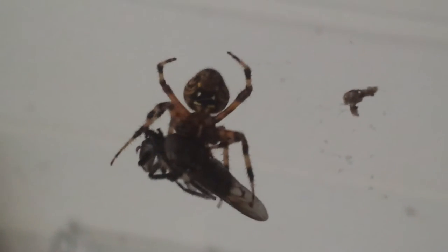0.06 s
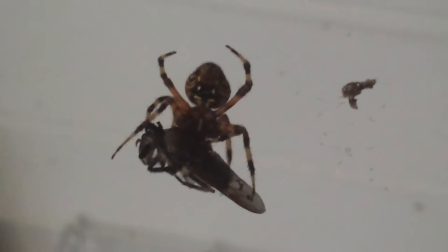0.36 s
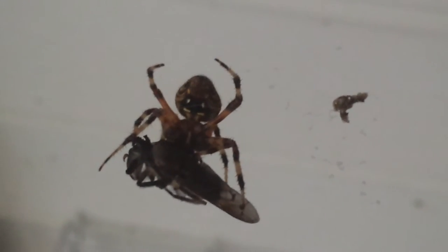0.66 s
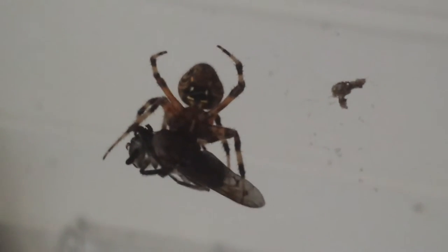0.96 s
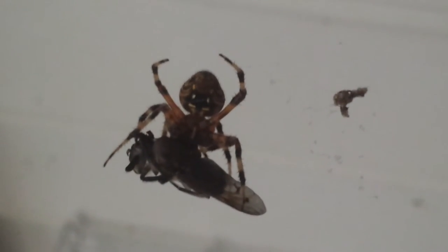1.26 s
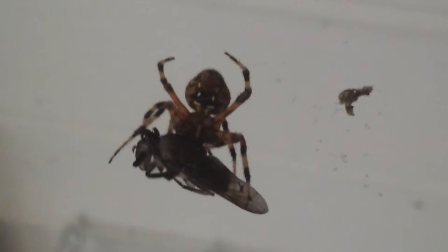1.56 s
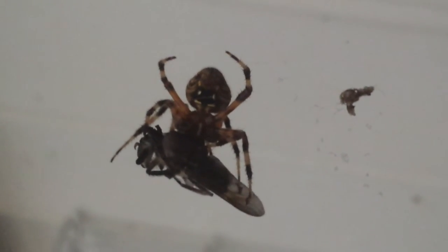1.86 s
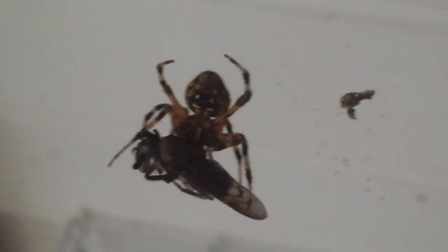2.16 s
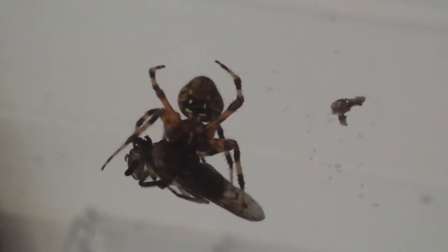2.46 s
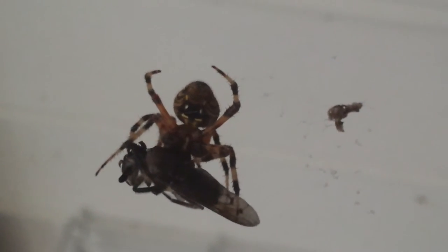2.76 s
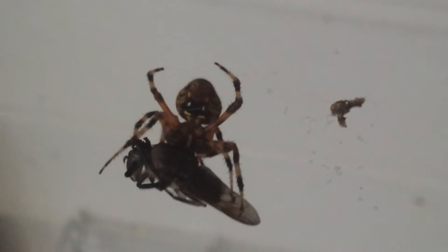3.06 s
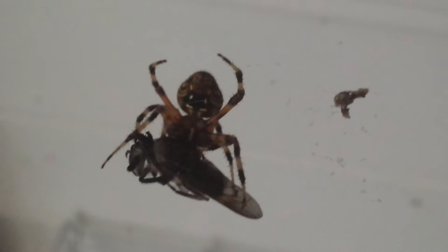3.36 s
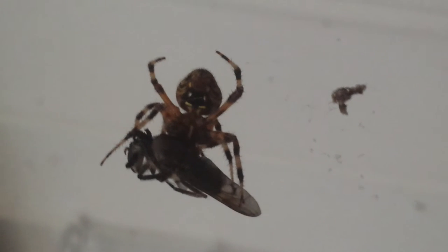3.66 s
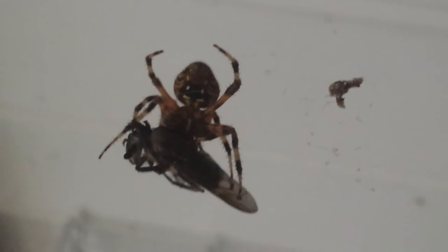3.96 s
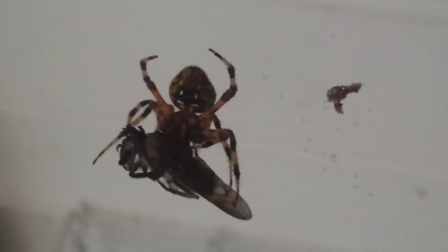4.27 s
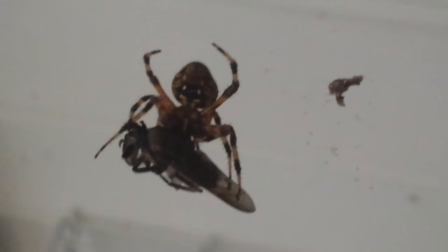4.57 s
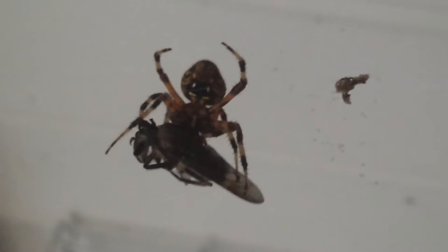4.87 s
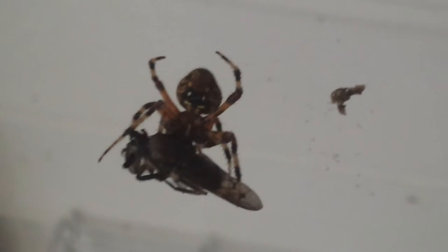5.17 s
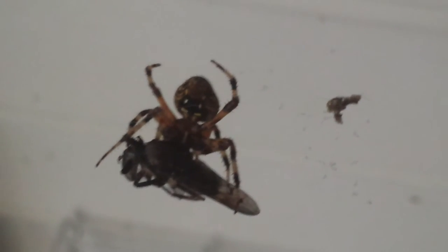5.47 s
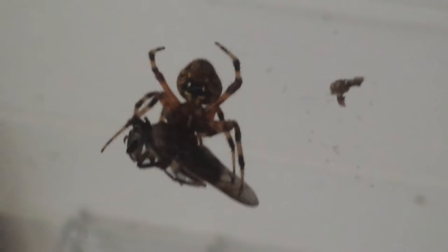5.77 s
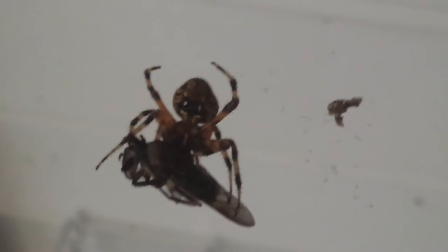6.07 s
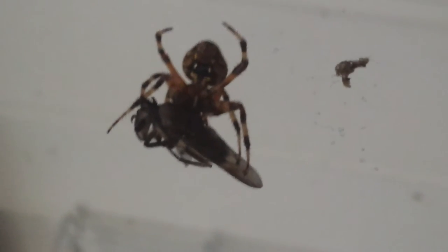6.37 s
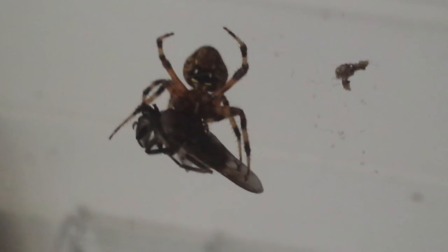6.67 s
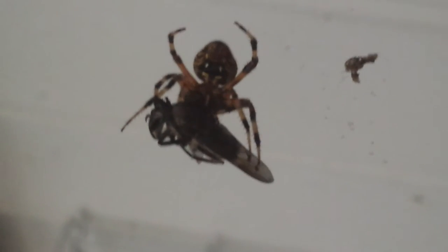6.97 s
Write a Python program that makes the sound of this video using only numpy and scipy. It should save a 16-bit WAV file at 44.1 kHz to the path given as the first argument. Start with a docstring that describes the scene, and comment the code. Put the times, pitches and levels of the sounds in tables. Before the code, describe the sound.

Night insects buzz steadily outdoors, one close and pulsing about six times a second, above a soft mechanical hum.

```python
"""A night insect rasps close to a porch, about six wing strokes a second, over a chorus of its neighbours.
Each stroke is a train of clicks, a scraper catching on a file, that rings the wings and echoes between
the walls, mostly on the left. Now and then the song rings out on one pitch. Lower down, a far katydid
scrapes faintly; behind it a motor hums, a low rumble fades in and the night air hisses."""
import sys
import numpy as np
from scipy import signal
from scipy.fft import rfft, irfft
from scipy.io import wavfile

SR = 44100
rng = np.random.default_rng(int(sys.argv[2]) if len(sys.argv) > 2 else 0)


def wav_record(signal):
    """Record a signal, one row per channel, as 16-bit PCM in the file named by sys.argv[1]."""
    frames = np.transpose(np.atleast_2d(signal))
    bounded = np.clip(frames, -1, 1)
    # unit amplitude maps onto the largest positive 16-bit level
    quanta = np.round(bounded * 32767).astype(np.int16)
    wavfile.write(sys.argv[1], SR, quanta)


N = 310023
T = np.arange(N) / SR
FREQS = np.maximum(np.arange(N // 2 + 1) * SR / N, 1)


def undb(db):
    """Decibels to gain."""
    return 10 ** (np.asarray(db) / 20)


def unit(x):
    """Scale each channel to rms 1."""
    return x / np.sqrt(np.mean(x ** 2, axis=-1, keepdims=True))


def over_hz(table, column=1):
    """A table column joined by straight lines over log frequency."""
    table = np.array(table)
    return np.interp(np.log(FREQS), np.log(table[:, 0]), table[:, column])


def colour(x, gain):
    """Filter by a gain for every frequency."""
    return irfft(rfft(x) * gain, N)


def resonance(hz, width):
    """Noise ringing in one steep-sided resonance."""
    peak = 1 / (1 + ((FREQS - hz) / (.75 * width)) ** 2)
    return unit(colour(rng.standard_normal(N), peak))


def walk(rate_hz):
    """A smooth random wander of spread 1."""
    return unit(colour(rng.standard_normal(N), np.exp(-(FREQS / rate_hz) ** 2)))


def tone(hz, db):
    """A sine of the given rms level whose phase drifts a little."""
    return undb(db) * np.sqrt(2) * np.sin(2 * np.pi * (hz * T + rng.random()) + 0.14 * walk(4.3))


def bursts(table, length_s):
    """A rounded swell of the given length for every row of centre in seconds and level in dB."""
    return np.sqrt(sum(undb(2 * db) * np.exp(-(2 * (T - s) / length_s) ** 2) for s, db in table))


def clicks(rate_hz, wander, scatter_db):
    """The scraper catches on the file at a wandering rate; every catch has its own force."""
    teeth_passed = np.cumsum(rate_hz * np.exp(wander * walk(14))) / SR + rng.random()
    catches = np.diff(np.floor(teeth_passed), prepend=0)
    return unit(catches * undb(scatter_db * rng.standard_normal(N)))


def porch(x, t60, direct_db):
    """Direct sound plus dense wall echoes, a different pattern at each ear."""
    t = T[:SR // 2]
    echo = rng.standard_normal((2, len(t))) * undb(-60 * t / t60)
    echo /= np.sqrt(np.sum(echo ** 2, axis=1, keepdims=True))
    echo[:, 0] += undb(direct_db)
    return unit(signal.fftconvolve(x[None], echo, axes=1)[:, :N])


def standing_waves(width_hz=24, ripple_db=3.3, spacing_hz=12):
    """Gain of the modes between the walls: a few strong ones, mostly left, and countless weak ones."""
    # The strong modes. Each row: frequency in Hz, boost at the left ear in dB.
    modes = [(5642, 6), (5776, 5.5), (5837, 3.5), (5931, 3), (5962, 3.5), (6186, 9.5), (6292, 2.5),
             (6348, 2.5), (6452, 3.5), (6789, 4.5), (6821, 5.5), (6908, 4), (7032, 5), (7106, 6), (7398, 9),
             (7580, 6)]
    knots = np.arange(0, SR / 2, spacing_hz)
    heights = np.clip(rng.standard_normal((len(knots), 2)), -2, 2)
    ripple = np.array([np.interp(FREQS, knots, ear) for ear in heights.T])
    strong_db = sum(db * np.exp(-(2 * (FREQS - hz) / width_hz) ** 2) for hz, db in modes)
    weak_db = ripple_db * ripple * np.exp(-np.abs(strong_db) / 2)  # smoothed out under a strong mode
    return undb(weak_db + strong_db * np.array([[1], [.5]]))


def air():
    """Distant outdoor noise and microphone hiss: centred in the lows, wide in the highs."""
    # Colour of the noise. Each row: frequency in Hz, level of the mid signal in dB per Hz.
    spectrum = [(15, -87), (40, -84.5), (80, -78), (130, -77.5), (230, -77), (320, -83.5), (430, -87),
                (600, -86.5), (850, -90), (1200, -94), (2900, -96), (10000, -104), (12500, -100.5),
                (15500, -102)]
    # How alike the ears are. Each row: frequency in Hz, correlation.
    likeness = [(60, 0.86), (130, 0.99), (290, 0.81), (640, 0.74), (1400, 0.4), (3000, 0)]
    # Stereo balance. Each row: frequency in Hz, left minus right in dB.
    balance = [(60, -2), (300, 1.2), (2400, 2), (9000, 10), (12000, -3.5)]
    alike = np.clip(over_hz(likeness), 0, 1)
    gain = undb(over_hz(spectrum)) * np.sqrt(SR / 2)
    mid = colour(rng.standard_normal(N), gain)
    side = colour(rng.standard_normal(N), gain * np.sqrt((1 - alike) / (1 + alike)))
    pan_db = over_hz(balance) / 2
    flutter = undb(0.59 * walk(15.0))
    return colour(np.array([mid + side, mid - side]), undb([pan_db, -pan_db])) * flutter


def rumble(fade_s=(0.96, 1.52), fade_db=(-72, -60)):
    """A low, far rumble that fades in and stays."""
    return resonance(hz=88.5, width=37) * undb(np.interp(T, fade_s, fade_db))


def motor(drone_hz=119.5, drone_db=-51, waver_db=0.4):
    """A steady mains drone, weaker shaft lines, and fan air ringing in its housing."""
    # Brief swells in the low hum, as when nearby noise beats against a steady drone.
    # Each row: centre in seconds, level of the added hum in dB.
    swells = [(.94, -50), (2.5, -64), (3.76, -55), (4.74, -49), (5.41, -56), (5.53, -59)]
    hum = tone(drone_hz, waver_db * walk(4.9)) * (undb(drone_db) + bursts(swells, length_s=0.04))
    # Shaft lines. Each row: frequency in Hz, average level in dB.
    shaft_lines = [(56.5, -79), (79.2, -70.5), (170.2, -73), (202.5, -69), (212.3, -69), (222, -72.5),
                   (887.6, -79.5)]
    shaft = sum(tone(hz, db + 3 * walk(4.3)) for hz, db in shaft_lines)
    # Fan housing resonances. Each row: frequency in Hz, width in Hz, level in dB.
    housing = [(122.7, 8.3, -60.5), (212.4, 10.4, -62.5), (370.8, 13, -64), (504, 28, -64.5),
               (586, 10, -73)]
    fan = sum(undb(db) * resonance(hz, width) for hz, width, db in housing)
    return (hum + shaft + fan) * undb([[.4], [-.4]])


def katydid():
    """Short dry scrapes from far off, in two bouts, some firmer than others."""
    # Colour of the rasp. Each row: frequency in Hz, relative level in dB.
    spectrum = [(900, -20), (1200, -12), (1550, 14.5), (1800, 5.5), (2300, 14.5), (2850, 12.5), (3400, 5),
                (3900, -30)]
    # The scrapes. Each row: centre in seconds, relative level in dB, length in seconds.
    scrapes = [(.02, -57, 0.069), (0.297, -58, 0.055), (.4, -59.5, .055), (.595, -56, .055),
               (.875, -59, 0.074), (1.155, -57.5, .064), (1.43, -56.5, 0.075), (1.73, -59.8, 0.06),
               (2.01, -59, .055), (2.88, -58, .045), (3.2, -58, .04), (3.485, -58, 0.059),
               (3.75, -57.3, 0.031)]
    rasp = porch(clicks(rate_hz=240, wander=0.085, scatter_db=3.5), t60=0.18, direct_db=-7.5)
    envelope = sum(bursts([(s, db)], length) for s, db, length in scrapes)
    return unit(colour(rasp, undb(over_hz(spectrum)))) * envelope * undb([[2], [.5]])


def ringing(right_db=-30):
    """Narrow, pitched swells that stand out of the chorus, on the left."""
    # Each row: centre in seconds, pitch in Hz, width in Hz, length in seconds, left level in dB.
    rings = [(.6, 6450, 350, 0.67, -35), (0.965, 6830, 140, 0.096, -31), (1.32, 6190, 100, 0.18, -29),
             (2.15, 5940, 350, 0.81, -33), (2.494, 6300, 140, 0.094, -30), (3.02, 5810, 140, 0.061, -28.5)]
    swells = sum(resonance(hz, width) * bursts([(s, db)], length) for s, hz, width, length, db in rings)
    return swells * undb([[0], [right_db]])


def other_singers(count=20):
    """Neighbours buzz on, each at its own click rate and stroke rate, blurred by distance."""
    crowd = 0
    for _ in range(count):
        stroke_hz = rng.uniform(9, 24) * (1 + 0.075 * walk(0.85))
        pulsing = 1 + 0.13 * np.sin(2 * np.pi * np.cumsum(stroke_hz) / SR)
        buzz = clicks(rate_hz=rng.uniform(105, 300), wander=.1, scatter_db=1.4)
        crowd = crowd + porch(buzz * pulsing, t60=0.37, direct_db=-15)
    return unit(crowd)


def near_singer():
    """Each wing stroke is a swelling train of clicks; the finer teeth of the file sizzle between them."""
    # Wing strokes. Each row: centre in seconds, relative force in dB.
    strokes = [(.145, -14), (.338, -4), (.503, 0), (.68, -1), (.836, -1), (.987, -1), (1.138, -1),
               (1.313, 0), (1.497, 0), (1.666, -1), (1.837, 0.5), (1.996, -1.5), (2.122, -1.5),
               (2.316, -1.5), (2.478, -0.5), (2.667, 0), (2.823, 0.5), (3.005, -0.5), (3.187, -0.5),
               (3.324, 1), (3.493, -0.5), (3.632, -2), (3.794, -1.5), (3.964, 0), (4.116, -3), (4.268, -3),
               (4.434, -1.5), (4.586, -0.5), (4.744, -1), (4.886, -3.5), (5.009, -2.5), (5.224, -2.5),
               (5.383, -1), (5.545, 0), (5.694, -1.5), (5.833, -1.5), (6.019, -0.5), (6.178, 1),
               (6.349, -1), (6.497, -1), (6.644, -2.5), (6.8, -2), (6.943, -2)]
    rasp = clicks(rate_hz=128, wander=.07, scatter_db=1.3)
    sizzle = undb(-12) * clicks(rate_hz=560, wander=.2, scatter_db=-0.5)
    return porch(bursts(strokes, length_s=0.073) * (rasp + sizzle), t60=0.34, direct_db=-8)


def chorus(near_db=-4, pivot_hz=6250, crossover_hz=900):
    """All singers ring with one wing colour; the song swells and its weight shifts around the pivot."""
    # Wing resonance. Each row: frequency in Hz, relative level in dB at the left ear, then the right.
    wings = [(2720, -108, -108), (3050, -103, -103), (3323, -86.5, -84), (3640, -87, -86.5),
             (4010, -78, -79), (4180, -73, -81), (4500, -71.5, -80.5), (4980, -68, -79.5), (5470, -66, -76),
             (5640, -60, -74.5), (5950, -57, -73.5), (6400, -57, -71), (6820, -58.5, -78.5),
             (7135, -61.5, -73), (7520, -68, -74), (7860, -76, -75.5), (8360, -75, -80.5),
             (9250, -85, -80.5), (9320, -83.5, -83.5), (9790, -100, -87.5), (10200, -125, -115)]
    # Swell of the whole chorus. Each row: time in seconds, relative level in dB.
    swell = [(0, -31.5), (.25, -33), (.5, -32.5), (1.35, -30), (2.55, -28.5), (3.3, -30), (4.6, -30),
             (5.2, -31), (6.45, -30), (6.68, -32.5), (7.03, -34.5)]
    # Tilt around the pivot. Each row: time in seconds, low side over high side in dB.
    tilt = [(0, -1.5), (1, -0.5), (3.5, 2), (6.2, 0.4), (7.03, 1)]
    level_db = np.interp(T, *np.transpose(swell)) - 0.5
    tilt_db = np.interp(T, *np.transpose(tilt))
    wing_gain = undb([over_hz(wings, column=1), over_hz(wings, column=2)])
    singers = undb(near_db) * near_singer() + other_singers()
    song = colour(singers, wing_gain * standing_waves())
    song /= np.std(song.mean(axis=0))
    low = colour(song, np.clip(.5 + (pivot_hz - FREQS) / crossover_hz, 0, 1))
    high = song - low
    return (low * undb(tilt_db / 2) + high * undb(-tilt_db / 2)) * undb(level_db)


def scene():
    """Insects over the hum and the night air."""
    return chorus() + ringing() + katydid() + motor() + rumble() + air()


def record(dry):
    """A steep low-pass cuts the top of the hiss."""
    top_hz = 15350
    return signal.sosfilt(signal.ellip(12, .1, 90, top_hz, fs=SR, output="sos"), dry)


dry = scene()
out = record(dry)
wav_record(out)
```